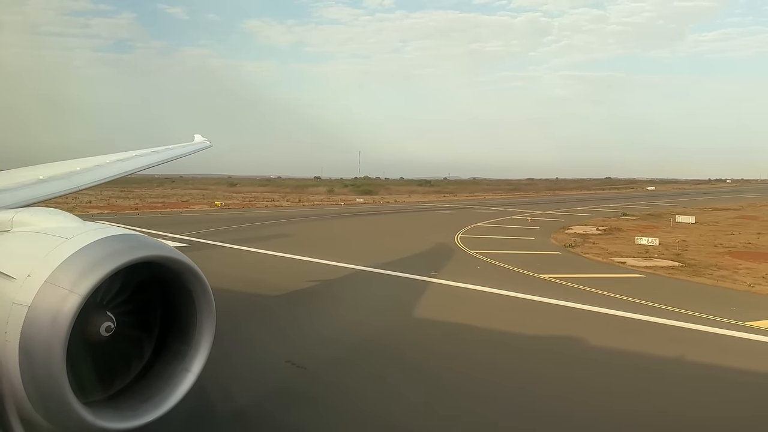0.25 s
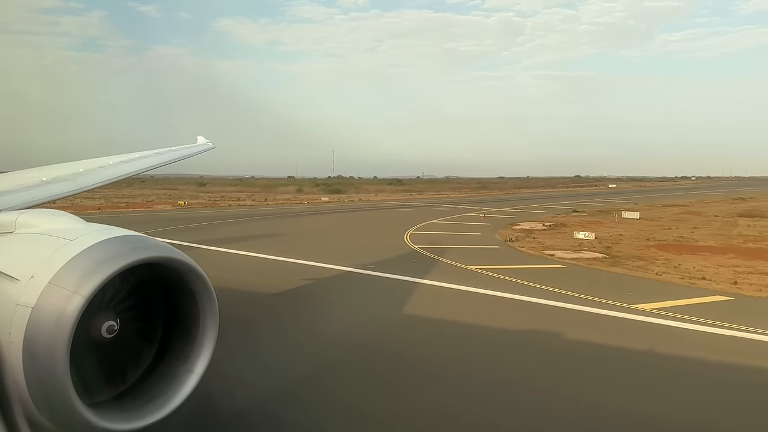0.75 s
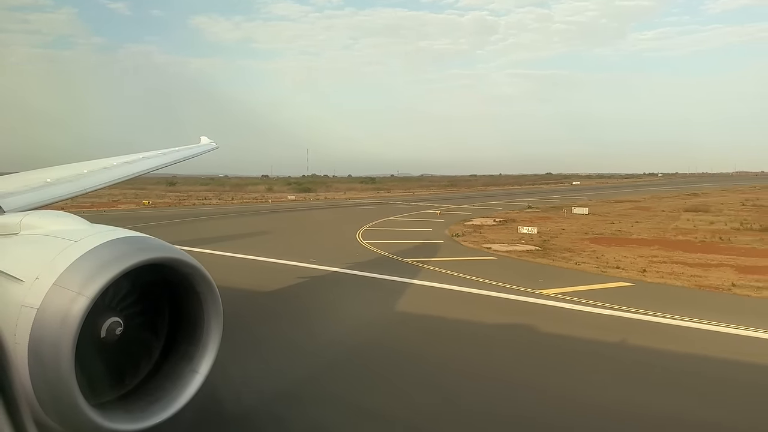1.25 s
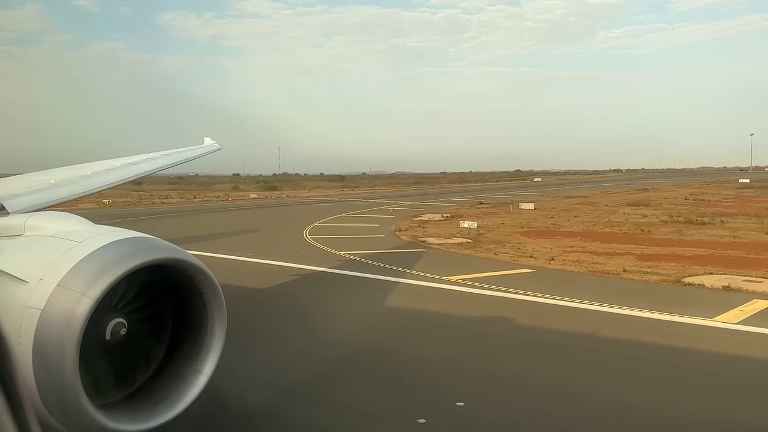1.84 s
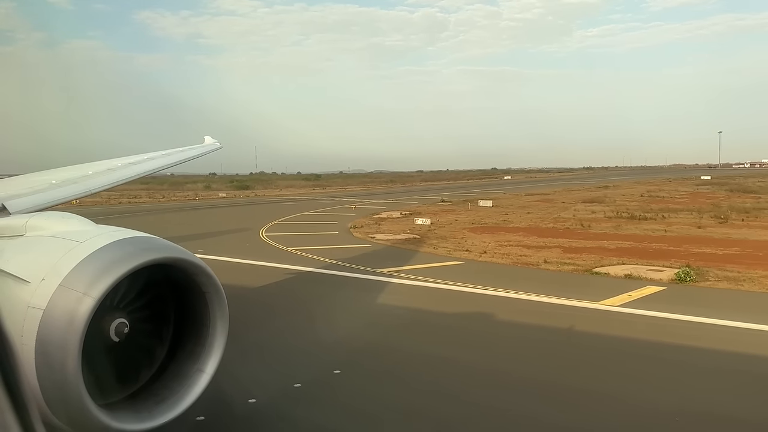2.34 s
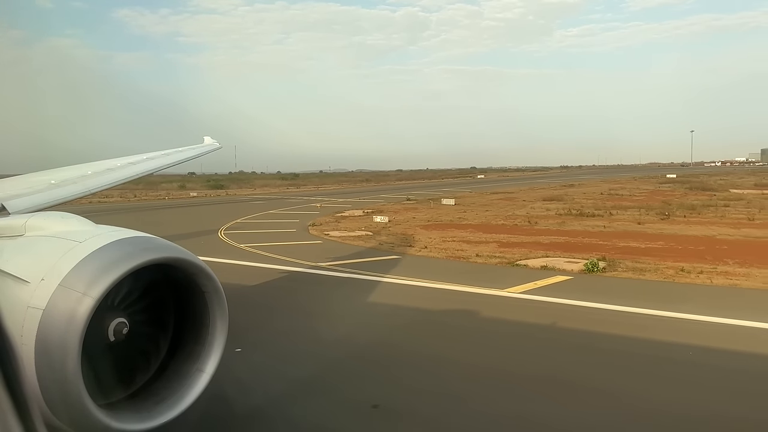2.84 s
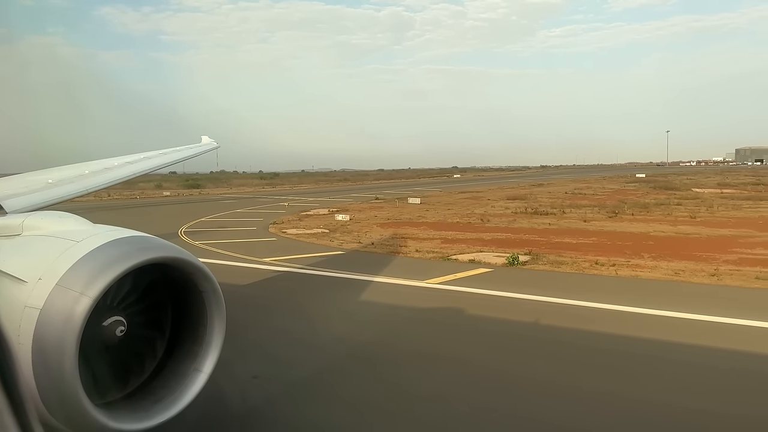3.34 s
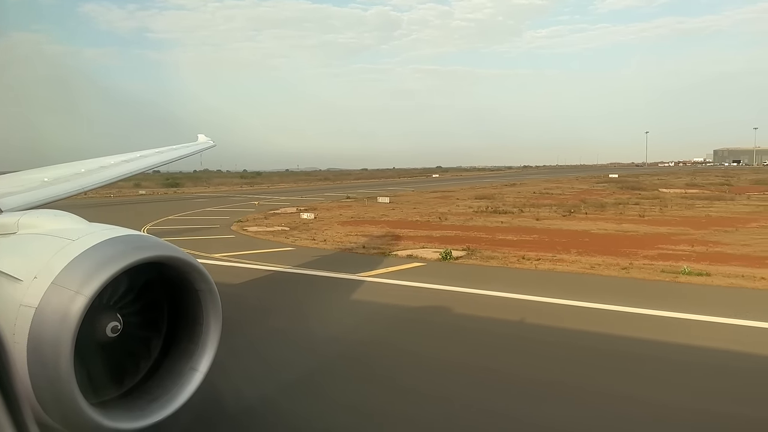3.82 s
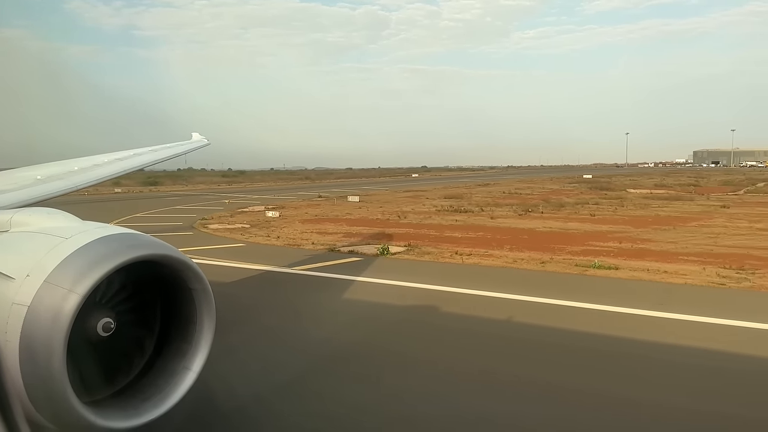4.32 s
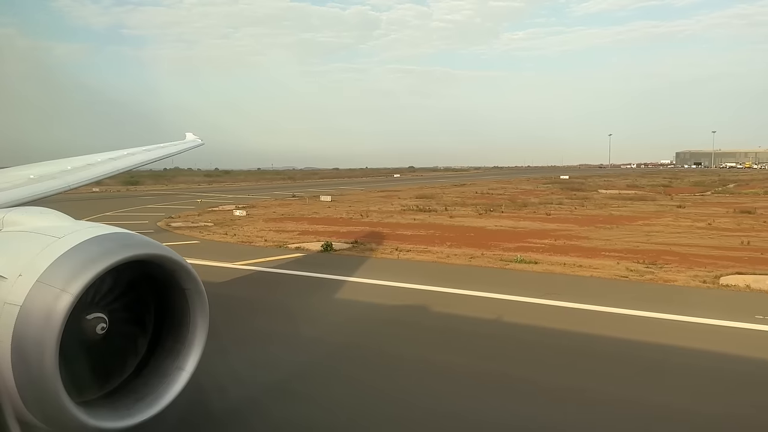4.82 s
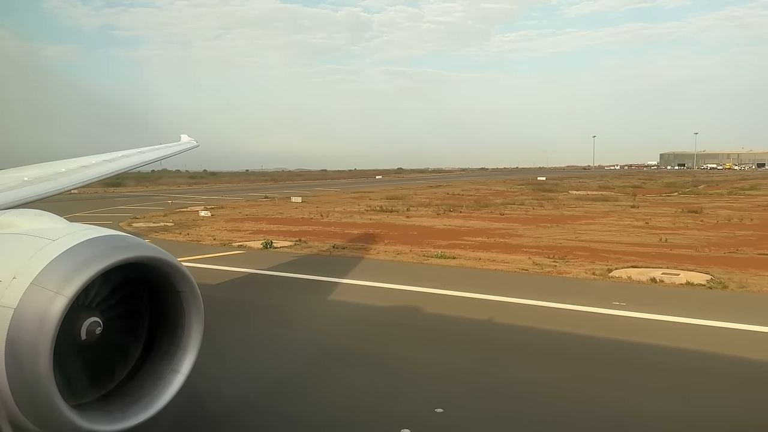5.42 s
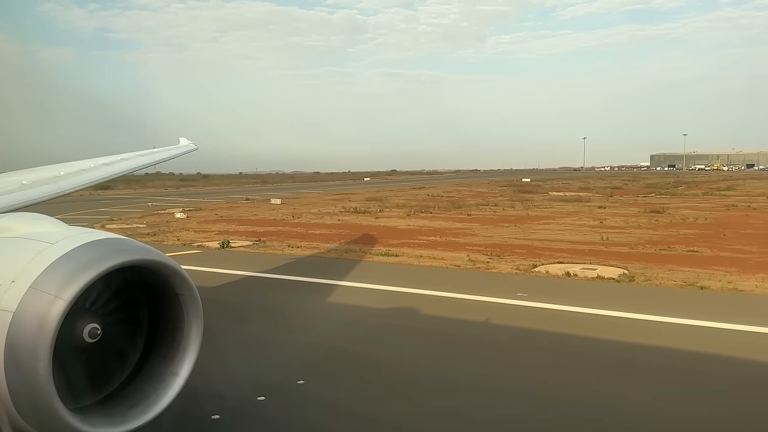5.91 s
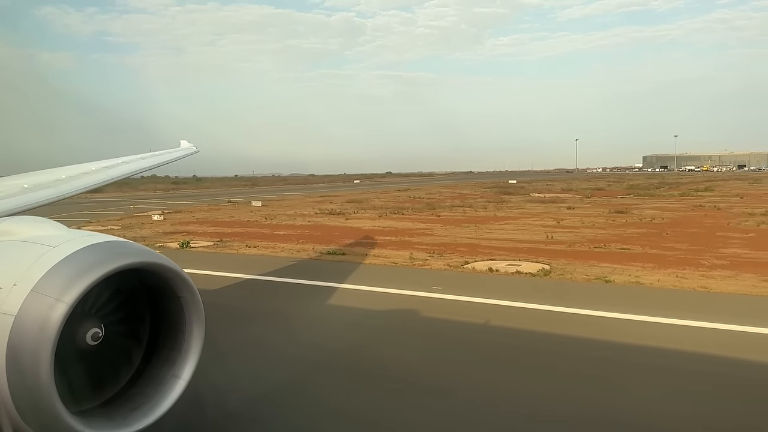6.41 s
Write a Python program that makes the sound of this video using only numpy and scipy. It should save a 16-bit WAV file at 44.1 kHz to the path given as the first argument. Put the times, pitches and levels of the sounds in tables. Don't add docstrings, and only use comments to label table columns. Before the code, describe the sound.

Inside an airliner cabin at a window seat, a deep fuselage roar runs throughout, with airy vent hiss and a faint high whistle. Runway joints make wall panels drum and patter. Faint machine whines and a pump hum come and go. A plastic latch clacks twice close to the stereo microphone midway, its spring jingling. Later a sleeve rustles, trim creaks, and the engine's fan tone climbs and swells.

```python
import sys
import numpy as np
from scipy import signal
from scipy.fft import rfft, irfft, next_fast_len
from scipy.io import wavfile
from scipy.ndimage import uniform_filter1d, map_coordinates

SR = 44100
rng = np.random.default_rng(int(sys.argv[2]) if len(sys.argv) > 2 else 0)


def how_loud(loudness_db):
    steps = np.asarray(loudness_db, float) / 20
    return 10 ** steps


def inscribe(sig):
    pcm = np.round(np.clip(np.atleast_2d(sig).T, -1, 1) * 32767)
    wavfile.write(sys.argv[1], SR, pcm.astype(np.int16))


N = 293706
TIME = np.arange(N) / SR
SIDES = np.array([[0.5], [-0.5]])


def unit(x):
    return x / np.sqrt(np.mean(x ** 2) + 1e-20)


def along(points, hz):
    f, v = np.transpose(points)
    return np.interp(np.log(hz + 1), np.log(f + 1), v)


def wobble(rate):
    return map_coordinates(rng.standard_normal(int(N * rate / SR) + 4), [np.arange(N) * rate / SR])


def running(start, stop, rise, fall):
    early = np.clip(start - TIME, 0, None) / rise
    late = np.clip(TIME - stop, 0, None) / fall
    return np.exp(-early ** 2 - late ** 2)


def filtered(x, response):
    edge = SR // 4
    x = np.pad(x, [(0, 0)] * (x.ndim - 1) + [(edge, edge)], mode="reflect")
    m = next_fast_len(N + 2 * edge)
    return irfft(rfft(x, m) * response(np.fft.rfftfreq(m, 1 / SR)), m)[..., edge:edge + N]


def peaks(hz, rows, power):
    return sum(height / (1 + (2 * (hz - centre) / width) ** power) for centre, width, height in rows)


# (frequency [Hz], left minus right [dB])
FIELD_TILT = [(50, 0.2), (120, -2.5), (220, -5.5), (350, -5), (520, -11), (750, -7), (1000, -2),
              (1300, -11), (1620, -8), (1900, -4), (2600, -4.5), (4300, -1), (6500, -4.5), (9000, -2)]
# (frequency [Hz], left port leads [rad])
FIELD_LEAD = [(30, -.3), (78, -.55), (125, -.35), (195, -.7), (255, 0), (330, -.4), (420, 2.3), (800, 2),
              (1000, 1.4), (1400, 2.8), (1750, 1.5), (1900, .5), (2400, 0), (4800, -.2), (6000, -.5)]
# (frequency [Hz], left port leads
TREBLE_LEAD = [(7000, -.6), (7800, .4), (8200, .8), (8450, 1.25), (8800, 2), (9050, 3.1), (10550, 3.2),
               (10850, 5.6), (11100, 6), (11600, 6.2), (13200, 6.4), (13600, 7.4), (13900, 8.3),
               (14300, 8.7), (15000, 9.4), (16000, 9.5)]


def ports(hz):
    half = how_loud(along(FIELD_TILT, hz) / 2) * np.exp(0.5j * along(FIELD_LEAD + TREBLE_LEAD, hz))
    return np.array([half, 1 / half]) / np.sqrt(0.5 * (abs(half) ** 2 + abs(half) ** -2))


# (frequency [Hz], likeness
PORTS_ALIKE = [(40, 0.89), (150, 1), (200, 0.91), (290, 0.67), (350, 0), (520, 0.82), (730, 0.95),
               (1000, 0.97), (1200, 0.79), (1700, 0.1), (2400, 0.28), (2800, 0), (4400, 0), (4770, 0.9),
               (5100, 0.02),
               (6000, 0.1), (6800, 0.1), (7700, .85), (8300, 0.85), (9000, 0.9), (16000, .95)]


def rush(colour_db, patchy_db):
    z = signal.stft(rng.standard_normal((2, N)), nperseg=512)[2]
    patches = uniform_filter1d(rng.standard_normal(z.shape[1:]), 6, 0)
    patches = uniform_filter1d(patches, 14, 1)
    pair = signal.istft(z * how_loud(patchy_db * unit(patches)), nperseg=512)[1][:, :N]

    def mix(hz):
        turn = np.arccos(np.clip(along(PORTS_ALIKE, hz), 0, 1)) / 2
        return how_loud(colour_db(hz)) * [np.cos(turn), np.sin(turn)]

    shared, own = filtered(pair, mix)
    return unit(filtered(np.array([shared + own, shared - own]), ports))


def tone(hz, db, flutter_db, drift=0.0023, lead=0):
    phase = 2 * np.pi * np.cumsum(hz * (1 + drift * wobble(6))) / SR
    start = 2 * np.pi * rng.random()
    return np.sqrt(2) * how_loud(db + flutter_db * wobble(5)) * np.sin(phase + lead + start)


# (time [s], blade tone [Hz])
FAN_SPEED = [(0, 301.2), (3, 313.5), (4.55, 343), (5.58, 353), (5.88, 364), (6.05, 372), (6.33, 398.3),
             (6.52, 421), (6.6, 432), (6.66, 439)]


def blade_rate():
    s, hz = np.transpose(FAN_SPEED)
    return np.interp(TIME, s, hz)


def thrust():
    blade_hz = blade_rate()
    return (2 * (blade_hz / blade_hz[0] - 1)) ** 2


# (time [s], boom rise [dB], large panel rise [dB], small panel rise [dB])
JOLTS = [(.04, -2.5, 6.5, 5), (.33, -5, 4, 2.5), (.5, 2.5, 1.5, -1), (.9, 0.5, 1.5, -1.5),
         (1.11, -1, 3.5, 2), (1.32, 2.5, -1, -4), (1.91, 3, 0, -3.5), (2.13, 2.5, 0, -4),
         (2.3, 0.5, 0, 2.5), (2.95, 1.5, 0.5, -7), (3.56, 0.5, -1, 2.5), (4.02, 4, -2.5, 0),
         (4.45, -1.5, 4.5, -3.5), (4.83, 1.5, 3, 0), (5.298, 2.5, 1, 1.5), (5.67, -2, 2.5, 5.5),
         (5.9, 1, 2.5, 2.5), (6.069, 3, 10.5, -0.5), (6.15, 3, -4, 6), (6.25, -6.5, 8.5, 1),
         (6.41, 2, 5, 0.5)]


def jolts():
    half_s = 0.083
    return sum(np.array(rises_db)[:, None] * running(s, s, half_s, half_s) for s, *rises_db in JOLTS)


# (frequency [Hz], level [dB per Hz])
BOOM_COLOUR = [(8, -46.5), (22, -17), (30, -18), (40, -8.5), (57, 2), (68, -4.5), (80, -3.5), (100, -6.5),
               (125, -3.5), (150, -14.5), (200, -35), (300, -93)]


def boom(shake_db):
    return how_loud(-22.5 + shake_db + 2.5 * thrust()) * rush(lambda hz: along(BOOM_COLOUR, hz), patchy_db=-0.24)


# (frequency [Hz], level [dB per Hz])
DRUM_COLOUR = [(100, -57.5), (150, -14.5), (172, -4), (190, -1), (208, -6), (240, -17.5), (300, -84)]


def drum(load_db):
    return how_loud(-26.5 + load_db) * rush(lambda hz: along(DRUM_COLOUR, hz), patchy_db=-0.35)


# (frequency [Hz], level [dB per Hz])
PATTER_COLOUR = [(150, -36.5), (205, -0.5), (230, -1.5), (280, -2.5), (330, -14.5), (450, -68)]


def patter(rattle_db):
    scrub_db = 4 * (running(0, 3.92, 1, 0.64) - 1)
    return how_loud(-28 + scrub_db + rattle_db) * rush(lambda hz: along(PATTER_COLOUR, hz), patchy_db=0.44)


# (frequency [Hz], level [dB per Hz])
BODY_COLOUR = [(220, -34), (330, -3), (420, -3), (520, -1), (680, -2), (900, -7), (1250, -10), (1400, -9),
               (1520, -13.5), (1700, -12.5), (1830, -16), (2250, -17.5), (2600, -25.5), (3600, -75.5)]
# (time [s], half length [s], rise [dB])
SWELLS = [
    (0.14, 0.23, 0.5),
    (1.677, 0.16, 1),
    (3.55, 0.085, 1),
    (4.3, 0.43, -0.5),
    (5.1, 0.22, 1),
]


def body(air_db, surge):
    swell_db = sum(db * running(s, s, half_s, half_s) for s, half_s, db in SWELLS)
    level_db = -34.25 + swell_db + 0.35 * air_db + 0.5 * thrust() + 0.091 * surge
    return how_loud(level_db) * rush(lambda hz: along(BODY_COLOUR, hz), patchy_db=1.14)


# (frequency [Hz], level [dB per Hz])
HISS_COLOUR = [(2000, -19), (2700, 0), (3200, -0.5), (3800, -5), (4500, -3.5), (5200, -6), (6300, -10.5),
               (8100, -12), (9000, -13), (10250, -9), (11300, -19.5), (13000, -27.5), (14000, -16.5),
               (15700, -17.5)]
# (frequency [Hz], width [Hz], boost [dB])
DUCTS = [(7740, 250, 3.5), (8460, 170, 2.5), (8600, 780, 3), (9450, 160, 1.5), (10900, 160, 4.5),
         (12500, 450, 6.5), (14400, 400, -1.5)]
# (frequency [Hz], width [Hz], boost [dB])
HISS_NOTCH = (10690, 620, -32)


def hiss(air_db, surge):
    level_db = -51.5 + air_db + 0.3 * surge + 0.27 * wobble(22)
    ducts = [*DUCTS, HISS_NOTCH]
    return how_loud(level_db) * rush(lambda hz: along(HISS_COLOUR, hz) + peaks(hz, ducts, 4), patchy_db=0.7)


# (frequency [Hz], level [dB per Hz])
WHISTLE_COLOUR = [(4550, -50), (4650, -7), (4710, 0), (4790, -2), (4870, -2), (4920, -11), (5010, -50)]
# (frequency [Hz], lean [-1 to 1])
WHISTLE_LEAN = [(4650, -1), (4900, 1)]


def whistle(air_db, surge):
    lean = wobble(7)
    level_db = -58 + 2.2 * air_db + 0.68 * surge + 0.6 * wobble(2.8) + 1.7 * wobble(55)

    def edge(side):
        colour_db = lambda hz: along(WHISTLE_COLOUR, hz) + side * 8 * along(WHISTLE_LEAN, hz)
        return how_loud(side * 2 * lean - 4) * rush(colour_db, patchy_db=1.0)

    return how_loud(level_db) * (edge(-1) + edge(1))


def roar():
    shake_db, load_db, rattle_db = jolts()
    air_db = -0.374 * TIME + 1.5 * running(2.05, 2.05, 0.13, 0.13)
    surge = wobble(7.3)
    swing_db = (0.54 + 5 * running(5.24, 5.24, 0.43, 0.43)) * SIDES
    panels = how_loud(swing_db) * (drum(load_db) + patter(rattle_db))
    air = hiss(air_db, surge) + whistle(air_db, surge)
    return how_loud(0.27 * swing_db) * boom(shake_db) + panels + how_loud(0.2 * swing_db) * body(air_db, surge) + air


HUM_HZ = [78, 704, 796, 1384, 4323, 4850, 5122, 8797, 9991, 11186]
# (level [dB], flutter [dB], left minus right [dB], left port leads [rad])
HUM_LEVELS = [(-27, 0.5, -2, -.5), (-59, -1.5, -11, 0.5), (-55, 5.5, -4, 2), (-56, 0.7, -13.5, 1.5),
              (-75.5, 4.5, 2, 0.7), (-80, 2, 2, -2), (-80, 6, -4.5, 1.5), (-82.5, 1, -2, 5),
              (-83, -1, -1.5, 5), (-81, 1.5, 0.5, -2)]


def hum():
    return sum(tone(hz, db + pan_db * SIDES, flutter_db, drift=0.0003, lead=lead * SIDES)
               for hz, (db, flutter_db, pan_db, lead) in zip(HUM_HZ, HUM_LEVELS))


def valve():
    return (0.46 + running(1.53, 1.91, 0.12, 0.12)) * tone(1892, -58, 2.5, drift=0.0022)


# (frequency [Hz], width [Hz], tone level [dB])
WALL = [(344, 4, -48), (352, 3, -52), (364, 7, -48), (393, 11, -54), (432, 7, -33.5), (686, 8, -50),
        (712, 9, -43), (728.3, 8, -38), (760, 30, -50), (796, 18, -41), (830, 25, -49), (866, 14, -40)]


def fan():
    blade_hz = blade_rate()
    resonances = [(hz, width, how_loud(db)) for hz, width, db in WALL]
    wall = lambda hz: how_loud(-63) + peaks(hz, resonances, 2)
    blade = wall(blade_hz) * tone(blade_hz * (1 + 0.012 * wobble(30)), 0, 0.8, drift=0.006)
    octave = wall(2 * blade_hz) * tone(2 * blade_hz, 0, 0.5, drift=0.003)
    return how_loud(1.7 * wobble(25)) * (blade + octave)


# (multiple, level [dB])
WHINE_ORDERS = [(2, -5), (3, -8), (4, 0), (5, -10)]
# (start [s], stop [s], level [dB])
LOADS = [
    (1.07, 1.3, -46),
    (1.5, 1.777, -52),
    (1.95, 2.3, -52.5),
    (3.64, 3.855, -49.5),
    (5.7, 5.8, -54),
    (5.93, 6.277, -48.5),
]


def generator():
    unloaded = how_loud(-67)
    load = unloaded + sum(how_loud(db) * running(start, stop, 0.065, 0.065) for start, stop, db in LOADS)
    return load * sum(tone(k * 281.4, db, 0.85, drift=0.0031) * how_loud(2.5 * wobble(25))
                      for k, db in WHINE_ORDERS)


def pump():
    start, stop, db = 1.45, 3.7, -32
    stroke_hz = 126.5 + 1.125 * (TIME - start)
    thuds = 0.49 + 0.59 * running(2.6, stop, 0.15, 1)
    strokes = thuds * tone(stroke_hz, db + 2.5, 0.6) + tone(2 * stroke_hz, db + 0.19, 0.6)
    return running(start, stop, 0.13, 0.15) * strokes


# (time [s], peak [dB], left minus right [dB], brightness [dB], knock pitch [Hz])
CREAKS = [(1.827, -37, 0, 17.5, 5200), (1.832, -41, 0, 13, 5300), (2.198, -38, -1, 14, 5300),
          (2.205, -37, -8, 14, 3600), (2.3775, -43, -3, 7.5, 3000), (4.608, -27.5, 7, -2.5, 1200),
          (5.27, -24.5, 7.5, -13, 450), (5.717, -30.5, -1, 1, 3530), (6.198, -26, -9, -9, 470),
          (6.35, -29, -10.5, -18.5, 420), (6.615, -33.5, -5, 2, 3800), (6.619, -32.5, -6, 2, 3500)]
# (time [s], peak [dB], left minus right [dB], brightness [dB], knock pitch [Hz])
CLACKS = [(2.6595, -16.5, -5, 1.5, 1800), (2.662, -20, -6, 1, 2100), (2.667, -24.5, -9, -3, 900),
          (2.670, -25, -9, 2.5, 1500), (2.6726, -21, -4, 1.5, 1900), (2.674, -15, -8.5, -9.5, 796),
          (2.678, -25.5, -7, -0.5, 3130), (2.683, -24, -13, -0.5, 3130), (2.691, -24, -6, -4, 1400),
          (2.702, -27.5, -7, 1.5, 2000), (2.705, -21, -4, -3.5, 700), (2.8075, -23.5, -1, 0.5, 2300),
          (2.8093, -14.5, -10, -8.5, 770), (2.813, -20.5, -1, -1, 700), (2.8162, -17, -5, 1, 1760),
          (2.819, -25, -9, -4, 2300), (2.825, -33, -8, 2.5, 3130), (2.8749, -16.5, -5.5, -5.5, 900)]
# (frequency [Hz], level [dB])
SNAP_COLOUR = [(150, -12.5), (350, 9.5), (1200, 0.5), (2200, -3), (3500, -16.5), (6000, -28), (8500, -20.5),
               (10500, -34), (13000, -34), (14500, -35), (15500, -37), (16200, -68.5)]
# (frequency [Hz], level [dB], time to fall 60 dB [s])
PLASTIC = [(381, 0, 0.036), (765, 4.5, 0.01), (1220, 4.5, 0.015), (1590, -7, .012), (2170, -5, 0.014),
           (3130, -14.5, 0.039), (5200, -15.5, 0.024)]
# (frequency [Hz], left port leads [rad])
CONTACT_LEAD = [(300, 0), (480, 1.9), (1400, 1.9), (2400, 1.23), (6000, 1.6)]
# (frequency [Hz], left minus right added [dB])
CONTACT_TILT = [(2000, -2), (5000, 1), (12000, 6.5)]


def contacts():
    out, t = np.zeros((2, N + SR)), np.arange(SR // 8) / SR
    hz = np.fft.rfftfreq(len(t), 1 / SR)
    decay = how_loud(-60 * t / 0.015) + 0.85 * how_loud(-60 * t / 0.005) + how_loud(-9.5 - 60 * t / 0.15)
    attack = 1 - np.exp(-t / 0.0005)
    for s, db, pan_db, bright_db, knock_hz in CLACKS + CREAKS:
        def slope_db(f):
            rise_db = bright_db * np.log2(np.minimum(f, 6000) / 1000 + 0.11) / 1.03
            soft_db = (bright_db > 6) * 12 * np.log2(1 + (f / 8000) ** 2)
            return rise_db - soft_db

        colour = how_loud(along(SNAP_COLOUR, hz) + slope_db(hz))
        noise = unit(irfft(rfft(rng.standard_normal((2, len(t)))) * colour, len(t)))
        snap = (0.41 * noise[0] + 0.5 * noise) * decay
        ring = sum(how_loud(level + slope_db(mode_hz) - 60 * t / t60)
                   * np.sin(2 * np.pi * mode_hz * rng.normal(1, 0.019) * t) for mode_hz, level, t60 in PLASTIC)
        knock = how_loud(-2 - 60 * t * knock_hz / 6.5) * np.sin(2 * np.pi * knock_hz * t)
        blow = (how_loud(-7.0) * snap - ring / abs(ring).max() - knock) * attack
        out[:, round(s * SR):][:, :len(t)] += how_loud(db + 2.5 + pan_db * SIDES) * blow

    def paths(f):
        lead = along(CONTACT_LEAD + TREBLE_LEAD, f) * SIDES
        return np.exp(1j * lead) * how_loud(along(CONTACT_TILT, f) * SIDES)

    return filtered(out[:, :N], paths)


# (time [s], peak [dB])
PINGS = [(2.661, -51), (2.667, -47), (2.674, -51), (2.678, -54), (2.689, -51), (2.702, -46), (2.714, -52),
         (2.811, -49), (2.815, -45), (2.825, -51), (2.85, -51), (2.883, -49)]


def spring():
    out, t = np.zeros(N), np.arange(SR // 40) / SR
    mode = lambda hz: np.sin(2 * np.pi * hz * rng.normal(1, 0.015) * t)
    for s, db in PINGS:
        ping = (mode(13000) + how_loud(-9) * mode(6940)) * (1 - np.exp(-t / 0.00087))
        out[round(s * SR):][:len(t)] += how_loud(db - 60 * t / 0.013) * ping
    return np.array([out, np.roll(out, 1)]) * how_loud([[3.5], [1.5]])


# (time [s], half length [s], level [dB], centre [Hz], width [log Hz])
FLICKS = [
    (5.718, .004, -50, 3400, .13),
    (6.619, .005, -49, 3400, .17),
    (2.674, .012, -60, 14700, .06),
    (6.55, .04, -59, 3200, .025),
    (6.35, .04, -61, 3200, .025),
]
# (time [s], half length [s], level [dB], centre [Hz], width [log Hz])
RUSTLE = [
    (5.6, 0.27, -56, 710, 0.72),
    (4.1, 0.15, -56, 1720, 0.028),
    (4.7, 0.17, -58.5, 2060, 0.041),
    (5.048, 0.14, -62, 7000, 0.19),
]


def rustle():
    def band(centre_hz, width):
        colour = lambda hz: np.exp(-(np.log(hz / centre_hz + 1e-9) / width) ** 2)
        return unit(filtered(rng.standard_normal(N), colour))

    brush = sum(how_loud(db + 2.0 * wobble(11)) * running(s, s, half_s, half_s) * band(hz, width)
                for s, half_s, db, hz, width in RUSTLE + FLICKS)
    return brush * how_loud([[3], [-12]])


def gear():
    return running(6.22, 6.55, 0.055, 0.055) * tone(55.7, -25.5, 1.5, drift=0.021)


# (multiple, level [dB])
MOTOR_ORDERS = [(2, -6), (3, -7), (4, 0), (5, -18)]


def motor():
    motor_hz = 335
    orders = sum(tone(k * motor_hz, -44.5 + db, 1.0, drift=0.003) * how_loud(1.5 * wobble(25))
                 for k, db in MOTOR_ORDERS)
    tail = running(6.42, 6.63, 0.03, 0.03) * tone(3 * motor_hz, -47.5, 1.5, drift=0.002)
    return running(6.39, 6.51, 0.022, 0.04) * orders + tail


def machinery():
    right_side = how_loud([[-9], [0.8]])
    machines = valve() + fan() + pump() + gear() + right_side * (generator() + motor())
    return hum() + filtered(machines, ports)


# (frequency [Hz], width [Hz], left [dB], right [dB])
SEAT_MODES = [(377.5, 58, 7, 3.5), (532, 32, -1, -3.5), (825, 47, -3.5, -1), (1336, 47, -1.5, 1),
              (1400, 100, 5, 2), (1400, 68, 2.5, -4), (1570, 80, -1.5, 3.5), (1755, 70, 3.5, 2.5),
              (1800, 77, -1, -4), (2056, 150, -4, -2), (2290, 100, 1, 1.5), (2265, 82, 1.5, -5),
              (4530, 120, -6.5, -7), (4780, 200, 1.5, -3), (5300, 270, 2.5, 3.5), (6400, 500, 1, -0.5),
              (8000, 200, -6, -1.5), (8800, 200, -1, -1.5), (9100, 400, 6, 1), (10500, 250, -6, -5.5),
              (11400, 200, 3.5, 2), (11720, 250, -3.5, -0.5), (12400, 250, 3, 4.5), (12750, 200, -5.5, -4)]


def seat(hz):
    return how_loud(peaks(hz, [(c, w, np.array(dbs)[:, None]) for c, w, *dbs in SEAT_MODES], 2))


def scene():
    return filtered(roar() + machinery(), seat) + contacts() + spring() + rustle()


def band_limit(x):
    return signal.sosfilt(signal.butter(12, 15780, fs=SR, output="sos"), x)


def record(dry):
    return band_limit(dry)


dry = scene()
out = record(dry)
inscribe(out)
```